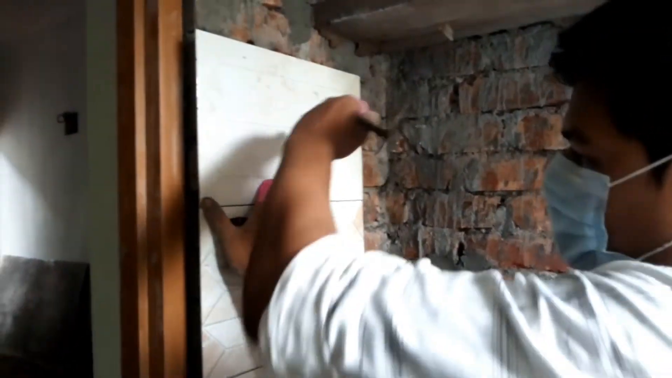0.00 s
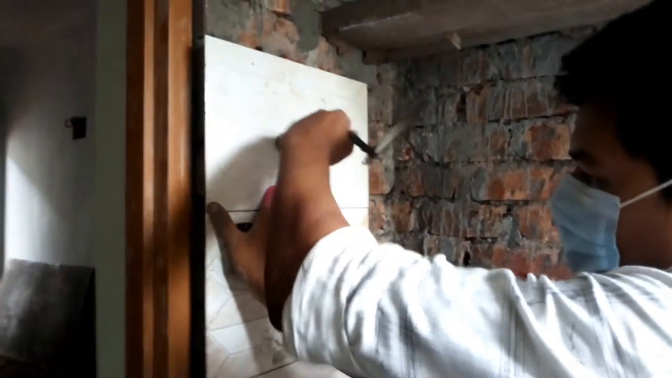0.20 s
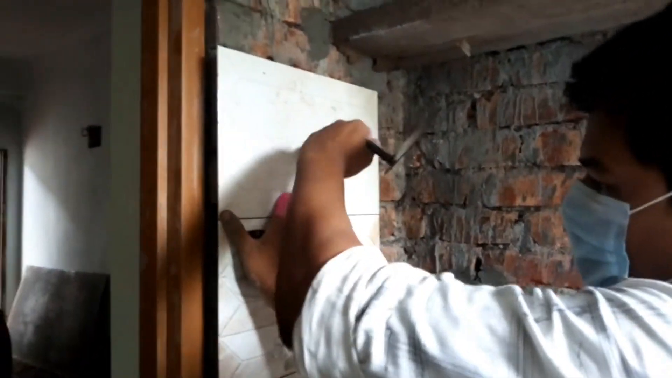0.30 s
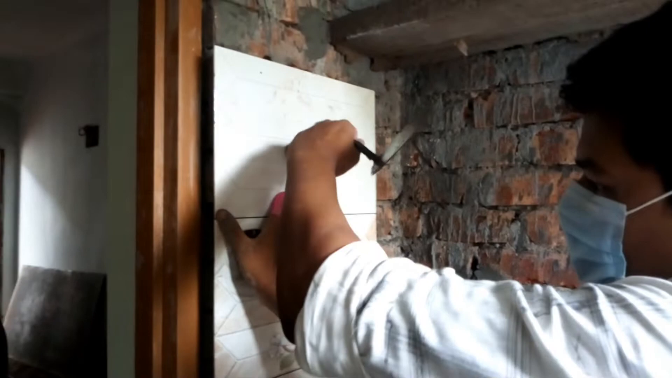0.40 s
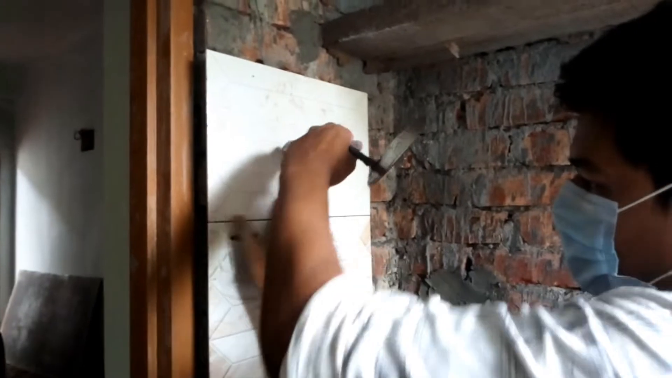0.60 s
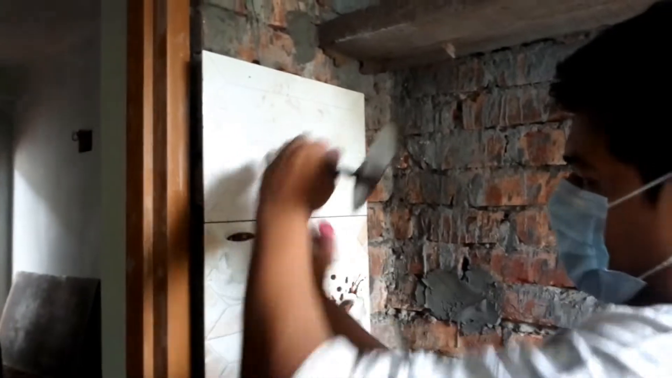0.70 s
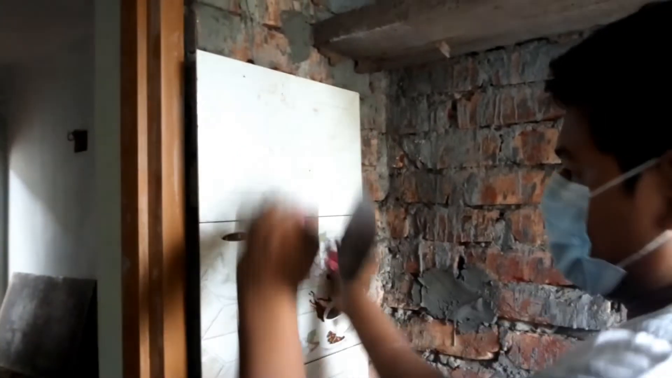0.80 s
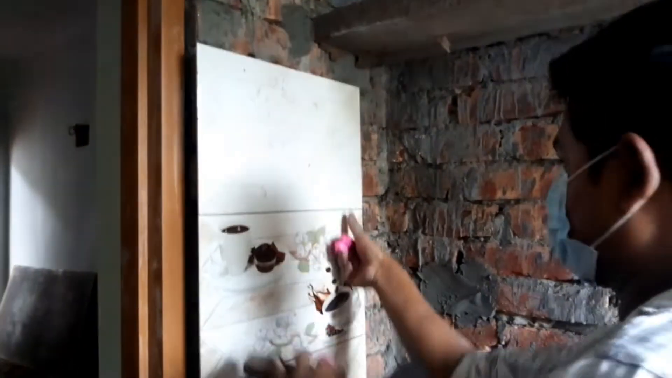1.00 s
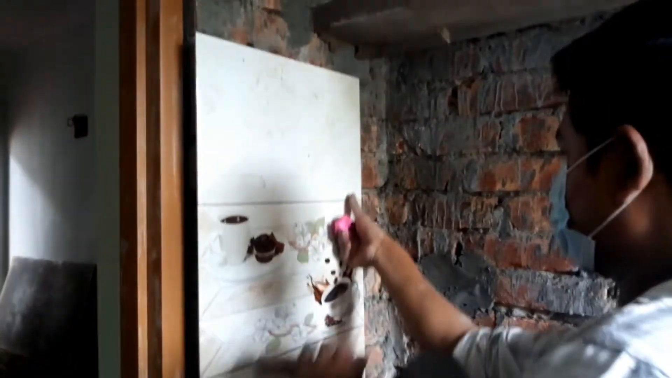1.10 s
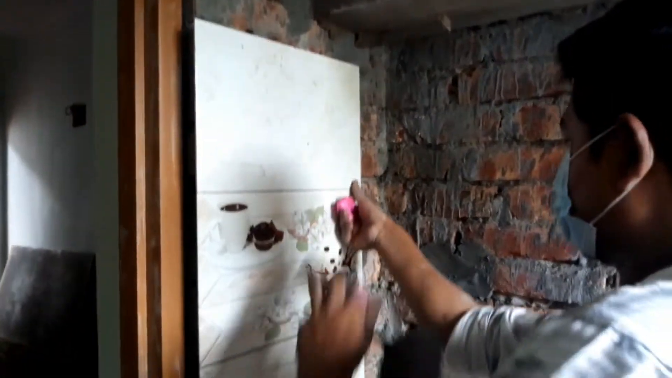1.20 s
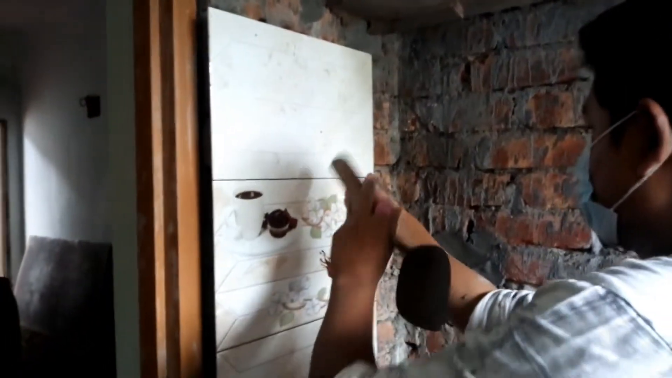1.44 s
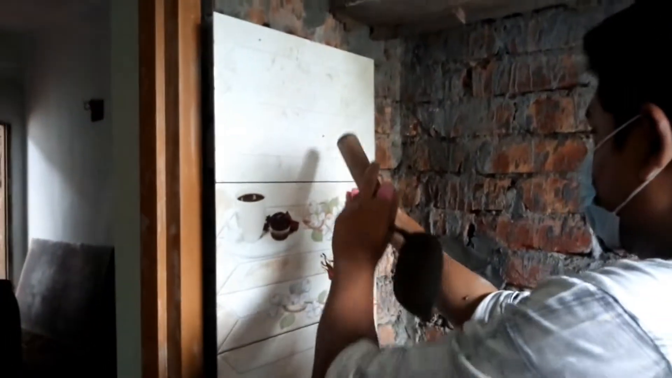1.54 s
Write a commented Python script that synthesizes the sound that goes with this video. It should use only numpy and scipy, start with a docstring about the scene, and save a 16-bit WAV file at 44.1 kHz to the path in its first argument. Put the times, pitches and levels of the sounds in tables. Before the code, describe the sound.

A mallet knocks twice in quick succession on a ceramic wall tile, each blow a dull clack with a brief ringing note. The small bare room booms and fades, then hands faintly bump the wall over a steady low hiss.

```python
"""Mallet knocks on a wall tile

A mallet grazes, then strikes, a ceramic tile twice in a small bare brick room. Damped by its mortar bed,
the tile gives a dead clack and one clear note; the room's standing waves and reverberation boom on.
Hands rub faintly on the glaze and afterwards bump the wall, over a steady hiss."""
import sys
import numpy as np
from scipy import signal
from scipy.fft import rfft, irfft
from scipy.io import wavfile

SR = 44100
rng = np.random.default_rng(int(sys.argv[2]) if len(sys.argv) > 2 else 0)


def inscribe(sig):
    """Save sig as 16-bit PCM at rate SR to the path in sys.argv[1].

    A 1-D sig is mono; a 2-D sig holds one channel per row.
    Samples are clipped to [-1, 1] before scaling.
    """
    pcm = np.round(np.clip(np.atleast_2d(sig).T, -1, 1) * 32767)
    wavfile.write(sys.argv[1], SR, pcm.astype(np.int16))


N = 70560
TIME, BIN_HZ = np.arange(N) / SR, np.fft.rfftfreq(N, 1 / SR)


def from_db(db):
    """Amplitude ratio: a factor of ten per 20 dB."""
    return 10 ** (np.asarray(db) / 20)


def at_hz(points, hz):
    """Interpolation along a logarithmic frequency axis."""
    frequencies, values = np.transpose(points)
    return np.interp(np.log(np.maximum(hz, 1)), np.log(frequencies), values)


def decay(t60_s):
    """Exponential damping: 60 dB lost in t60_s."""
    return np.exp(-np.log(1000) * TIME / t60_s)


def noise(colour):
    """Spectral shaping: white noise weighted by frequency, scaled to unit rms."""
    shaped = irfft(rfft(rng.standard_normal(N)) * from_db(at_hz(colour, BIN_HZ)), N)
    return shaped / shaped.std()


def ringing(modes):
    """Modal superposition: an impulse response is a sum of damped sinusoids."""
    return sum(from_db(db) * decay(t60_s) * np.sin(2 * np.pi * hz * TIME) for hz, db, t60_s in modes)


# Background spectrum: frequency_hz, relative_density_db
HISS_SPECTRUM = [(25, -16), (60, -6), (105, 3), (140, -4.5), (200, 0.5), (400, -3.5), (750, -9),
                 (1300, -8.5), (1800, -6.5), (2200, -3), (2650, -2.5), (3300, -9), (4200, -10.5),
                 (5250, -4), (5800, -9), (7000, -7.5), (7900, -11), (9300, -24.5), (12000, -28.5),
                 (15500, -31.5)]
def hiss(level_db=-58):
    """Stationary noise: a background of constant spectrum and level."""
    return from_db(level_db) * noise(HISS_SPECTRUM)


# Sleeve and fingers on the glaze: centre_s, width_s, pitch_hz, bandwidth_hz, level_db
RUB_STROKES = [(0.101, 0.18, 2360, 830, -61.5), (0.109, .04, 5200, 300, -63.5),
               (.84, 0.034, 5050, 150, -60)]
def rub(centre_s, width_s, pitch_hz, bandwidth_hz, level_db):
    """Sliding friction: noise in one resonance swells and fades in a Gaussian envelope."""
    edges_hz = [pitch_hz - bandwidth_hz / 2, pitch_hz + bandwidth_hz / 2]
    resonance = signal.butter(2, edges_hz, "band", fs=SR, output="sos")
    friction = signal.sosfilt(resonance, rng.standard_normal(N))
    swell = np.exp(-.5 * ((TIME - centre_s) / width_s) ** 2)
    return from_db(level_db) * friction / friction.std() * swell


# A graze, then a blow, for each knock: start_s, impulse_db, contact_ms, relative_crack_db
MALLET_CONTACTS = [(0.1970, -24, 0.42, -39.5), (0.2095, 1.5, 0.52, -25), (0.3969, -23.5, 0.21, -22.5),
                   (0.4018, 1.5, 0.41, -52)]
def mallet(crack_band_hz=(4000, 7200)):
    """Impact force: a shorter pulse has a wider spectrum; grit cracks at each pulse's peak."""
    force, cracks = np.zeros(N), np.zeros(N)
    for start_s, impulse_db, contact_ms, crack_db in MALLET_CONTACTS:
        progress = np.clip((TIME - start_s) * 1000 / contact_ms, 0, 1)
        pulse = np.sin(np.pi * progress) ** 2
        force += from_db(impulse_db) * pulse / pulse.sum()
        cracks[pulse.argmax()] += from_db(impulse_db + crack_db)
    grit_band = signal.butter(4, crack_band_hz, "band", fs=SR, output="sos")
    return force + signal.sosfilt(grit_band, cracks)


# Modes of the bedded tile, from dead clack to thin clink: pitch_hz, level_db, t60_s
TILE_MODES = [(563, -11, 0.025), (857, -11.5, 0.017), (1420, -11, 0.011), (2114, -19, 0.025),
              (1110, -24.3, .58), (1114.6, -32.5, .6), (1176, -50, 0.18), (1438, -53, 0.21),
              (1869, -40, 0.37), (2094, -35, 0.45), (2340, -38.5, 0.29), (2620, -38, .29), (3176, -29, .26),
              (3880, -33.5, 0.38), (4390, -30.5, 0.33), (4440, -27, .14), (5150, -40.5, 0.15),
              (6290, -34, 0.29), (6570, -32.5, .1)]
def tile(cutoff_hz=280):
    """Radiation from a small plate: its modes ring, but it radiates little below the cutoff."""
    radiation = signal.butter(2, cutoff_hz, "high", fs=SR, output="sos")
    return signal.sosfilt(radiation, -ringing(TILE_MODES))


# Modes of the room: pitch_hz, level_db, t60_s
STANDING_WAVES = [(113.26, -31.5, 1.0), (159.84, -25.5, 0.8), (171.2, -32, 0.89), (200.4, -31, 1.3),
                  (230.4, -34.5, 1), (246.1, -21, 0.93), (270, -30.5, .96), (274, -30.5, .96),
                  (284.4, -30.5, .95), (288.1, -30, 1.3), (319.2, -32.5, 0.67), (369.3, -28, 0.6),
                  (456, -30.5, 0.76), (540, -30, 0.43), (587.6, -37.5, 0.76), (828, -40, 0.81),
                  (953, -51, 0.78)]
def room_boom(build_s=.012):
    """Standing waves: room modes build up and decay, and those close in frequency beat."""
    return ringing(STANDING_WAVES) * (1 - np.exp(-TIME / build_s)) ** 2


# Spectrum of the reflections: frequency_hz, relative_density_db
REVERB_SPECTRUM = [(25, -18.5), (55, -27), (85, -11.5), (150, -6.5), (260, -0.5), (420, -2.5), (600, -1.5),
                   (750, -6), (1000, -5.5), (1450, -7), (2200, -8.5), (2800, -10.5), (3700, -11.5),
                   (4500, -9.5), (6500, -22.5), (10000, -38)]
# Reverberation times: frequency_hz, t60_s
REVERB_TIMES = [(60, 1.2), (130, 1.22), (250, 1.11), (500, 0.64), (1100, 0.67), (2000, 0.5), (3000, 0.32),
                (7000, .3)]
def reverberation(gain_db=-19, delay_s=0.00064, build_s=0.0013, bands=14):
    """Diffuse field: dense reflections build quickly and die band by band, the treble first."""
    spectrum = rfft(noise(REVERB_SPECTRUM))
    centres_hz = np.geomspace(60, 8000, bands)
    tail = np.zeros(N)
    for centre_hz, weights in zip(centres_hz, np.eye(bands)):
        triangular_band = at_hz(np.c_[centres_hz, weights], BIN_HZ)
        tail += irfft(spectrum * triangular_band, N) * decay(at_hz(REVERB_TIMES, centre_hz))
    onset = 1 - np.exp(-np.maximum(TIME - delay_s, 0) / build_s)
    return from_db(gain_db) * tail * onset


# Hands meeting the wall: start_s, gain_db
HAND_CONTACTS = [(0.984, -55), (1.245, -66), (1.311, -53), (1.374, -58)]
# Spectrum of a bump: frequency_hz, relative_density_db
BUMP_SPECTRUM = [(30, -32.5), (70, -31), (110, 18), (150, -8), (220, -0.5), (450, -14), (900, -28),
                 (3000, -42)]
def hand_bumps(attack_s=0.0042, t60_s=0.48):
    """Soft impacts: their energy lies at low frequencies and lingers in the room."""
    shape = (1 - np.exp(-TIME / attack_s)) * decay(t60_s)
    envelope = sum(from_db(gain_db) * np.interp(TIME - start_s, TIME, shape, left=0)
                   for start_s, gain_db in HAND_CONTACTS)
    return noise(BUMP_SPECTRUM) * envelope


def scene():
    """Linear superposition: mallet force convolved with tile and room, plus hands and hiss, in mono."""
    impulse_response = tile() + room_boom() + reverberation()
    knocks = signal.fftconvolve(mallet(), impulse_response)[:N]
    hands = hand_bumps() + sum(rub(*stroke) for stroke in RUB_STROKES)
    return (knocks + hands + hiss())[None]


def record(dry):
    """Band limiting: a steep low-pass filter removes the highest treble."""
    stopband_hz, attenuation_db = 16300, 70
    return signal.sosfilt(signal.cheby2(16, attenuation_db, stopband_hz, fs=SR, output="sos"), dry)


dry = scene()
out = record(dry)
inscribe(out)
```